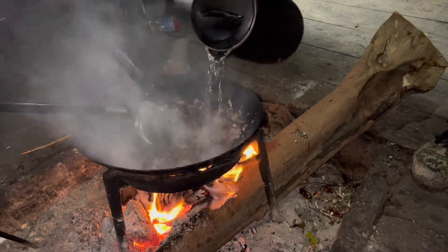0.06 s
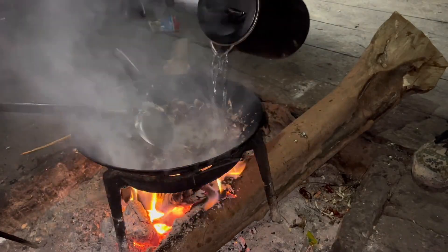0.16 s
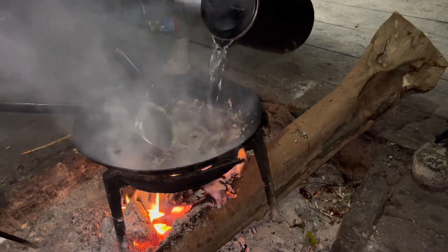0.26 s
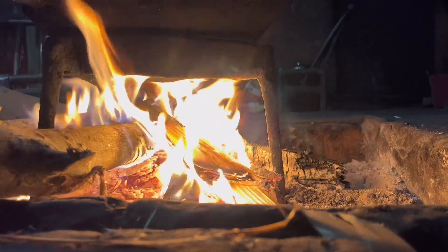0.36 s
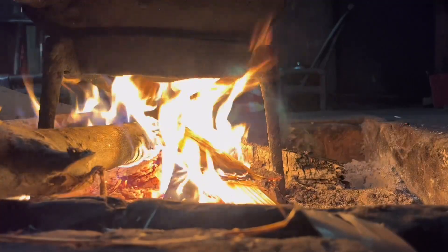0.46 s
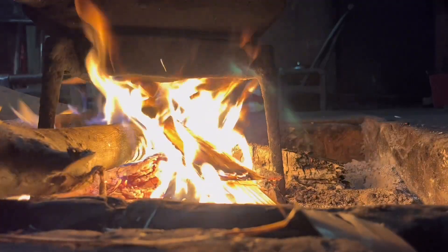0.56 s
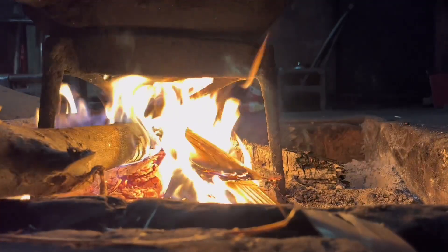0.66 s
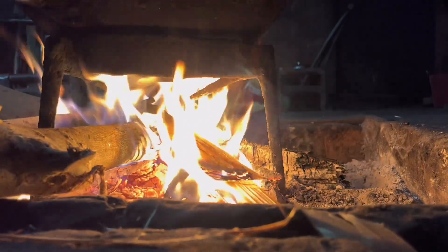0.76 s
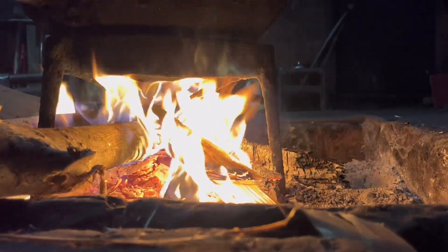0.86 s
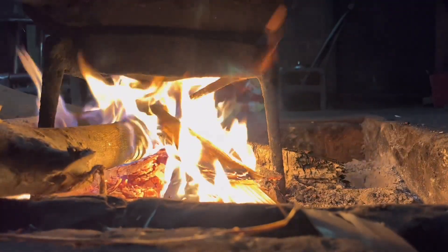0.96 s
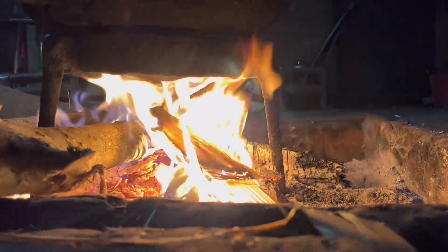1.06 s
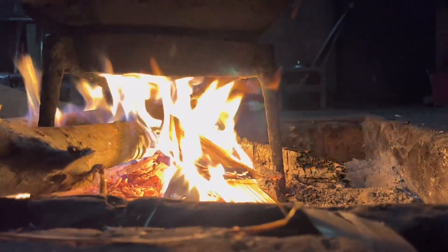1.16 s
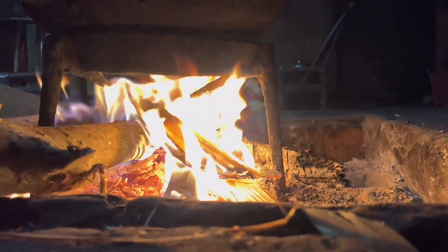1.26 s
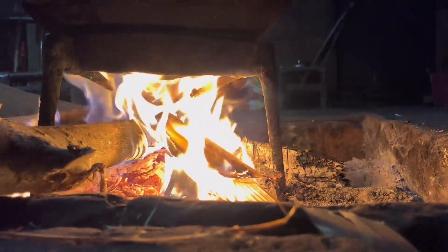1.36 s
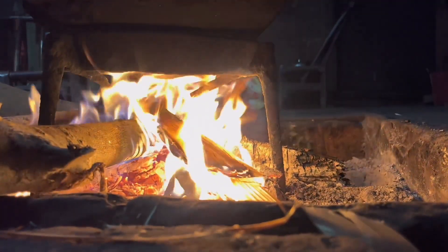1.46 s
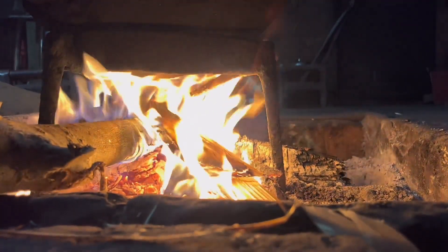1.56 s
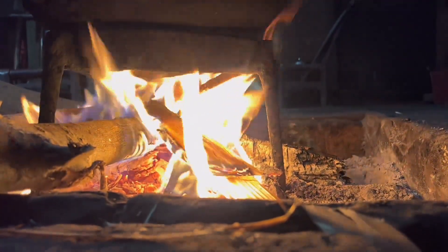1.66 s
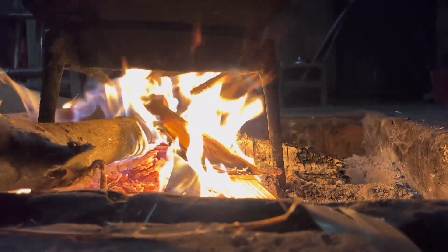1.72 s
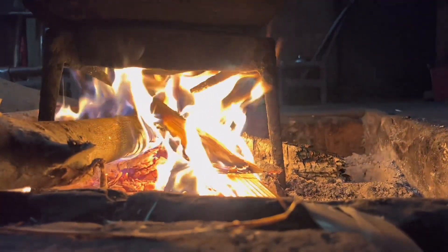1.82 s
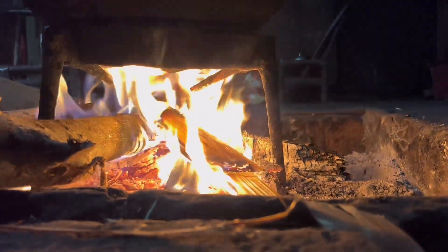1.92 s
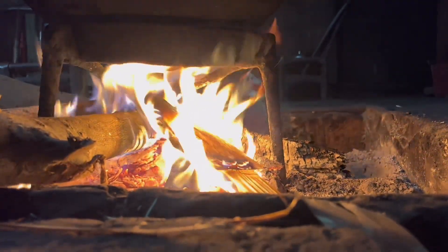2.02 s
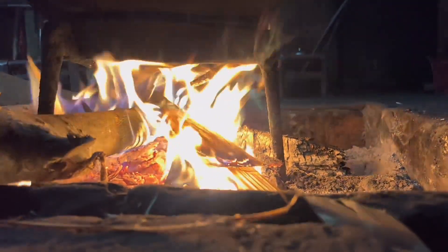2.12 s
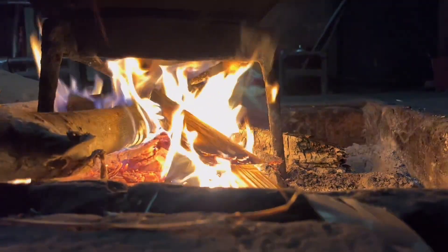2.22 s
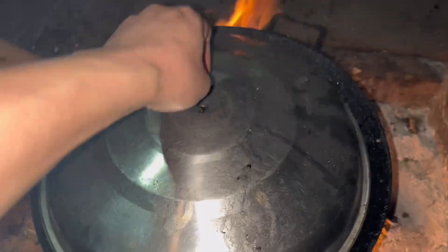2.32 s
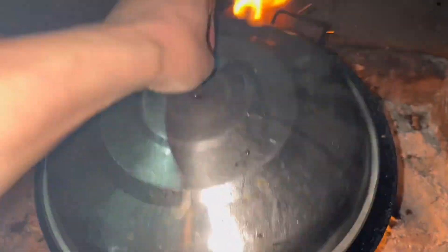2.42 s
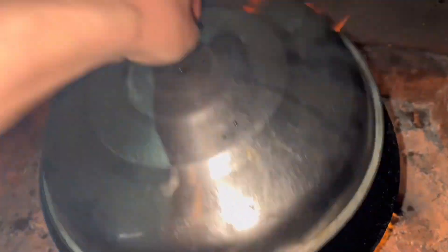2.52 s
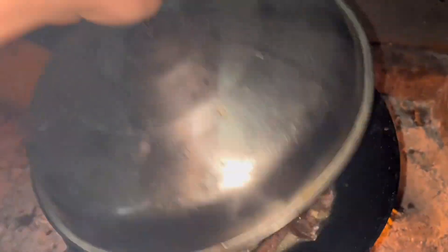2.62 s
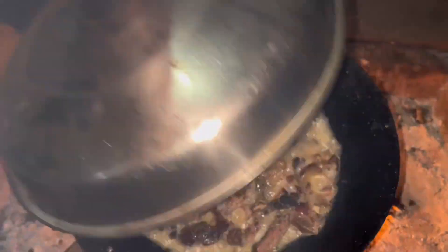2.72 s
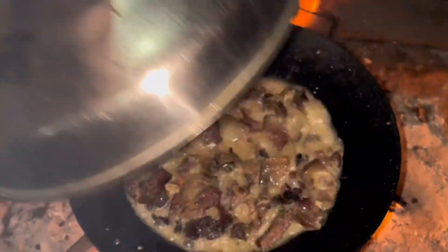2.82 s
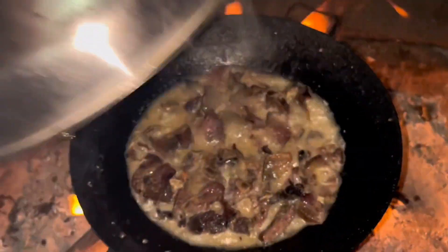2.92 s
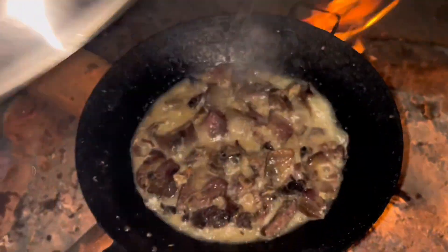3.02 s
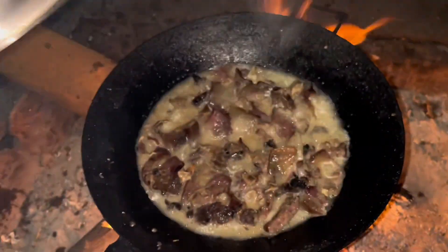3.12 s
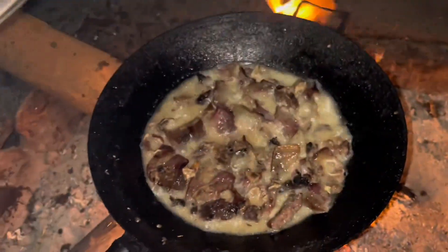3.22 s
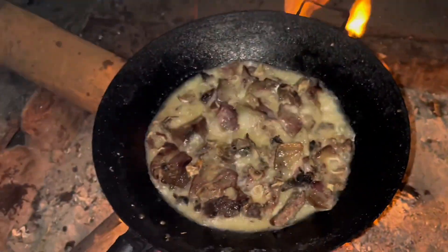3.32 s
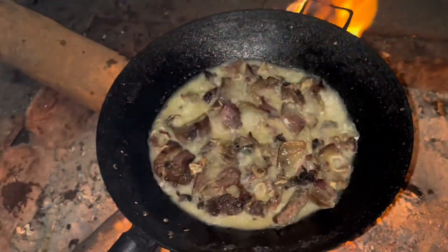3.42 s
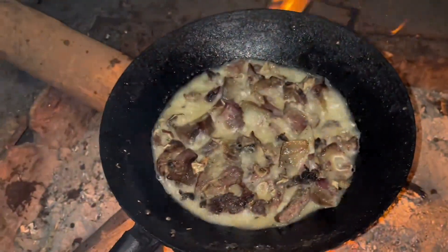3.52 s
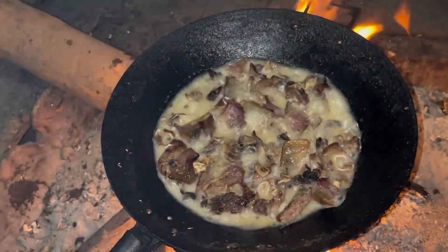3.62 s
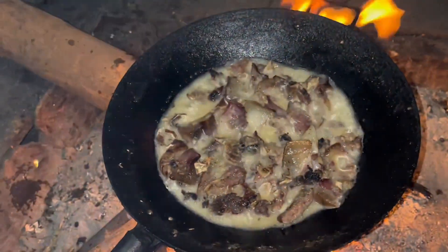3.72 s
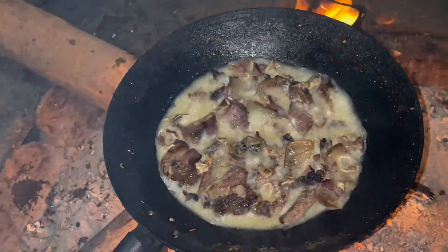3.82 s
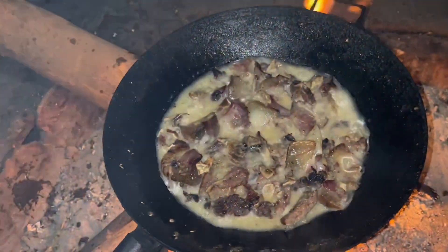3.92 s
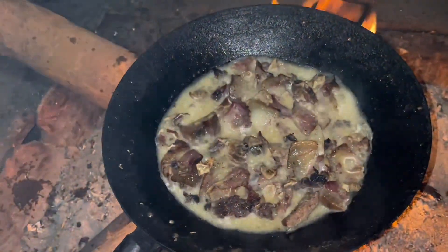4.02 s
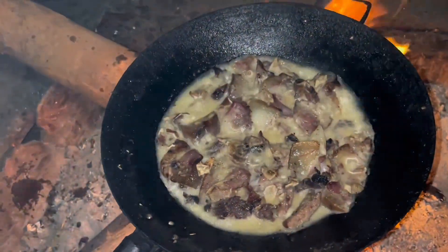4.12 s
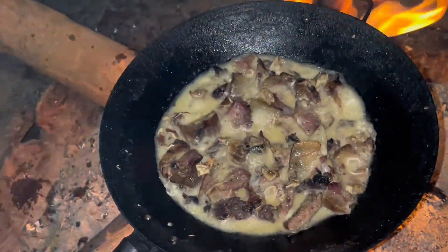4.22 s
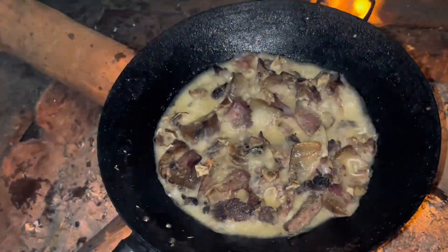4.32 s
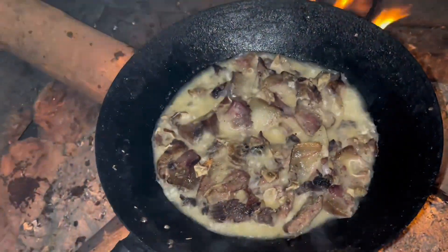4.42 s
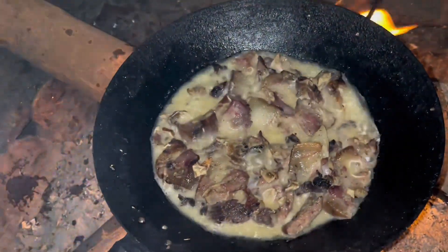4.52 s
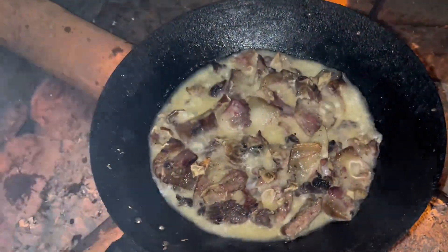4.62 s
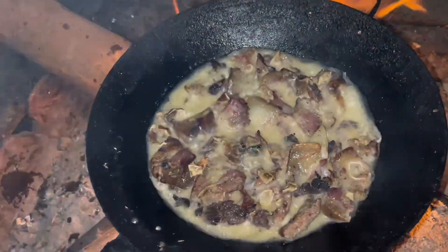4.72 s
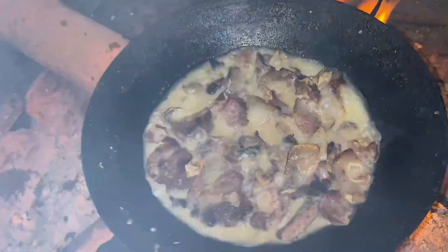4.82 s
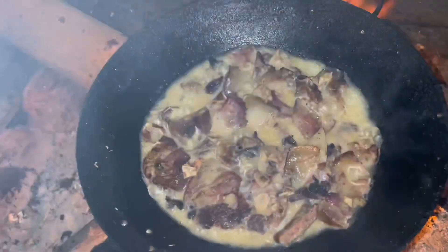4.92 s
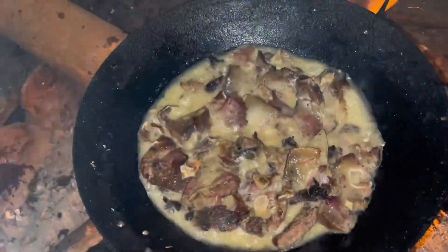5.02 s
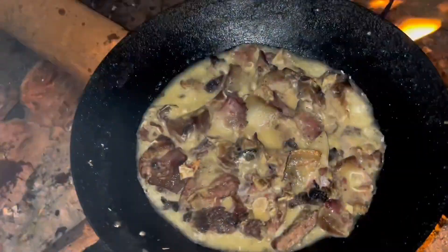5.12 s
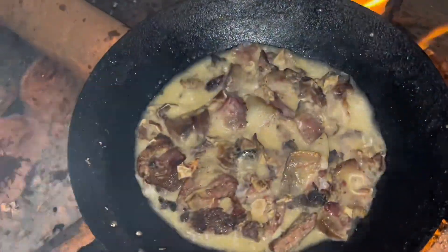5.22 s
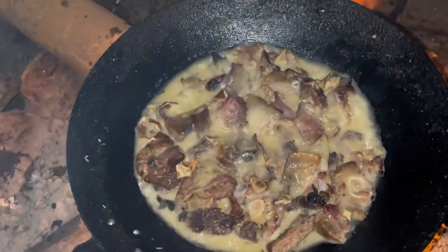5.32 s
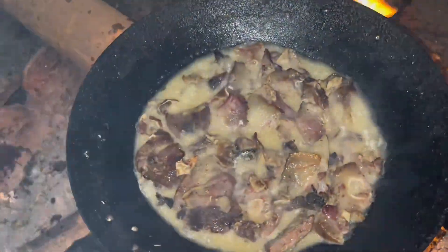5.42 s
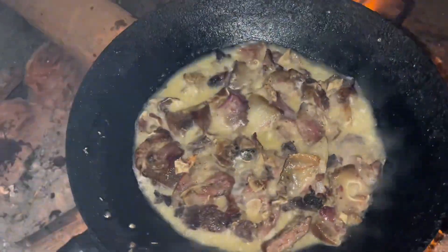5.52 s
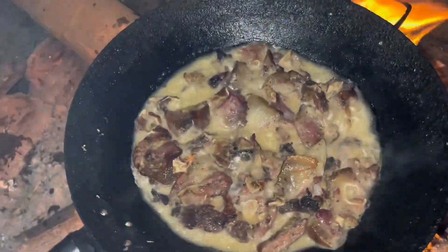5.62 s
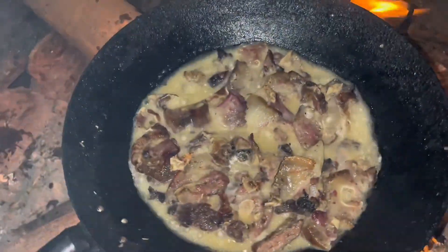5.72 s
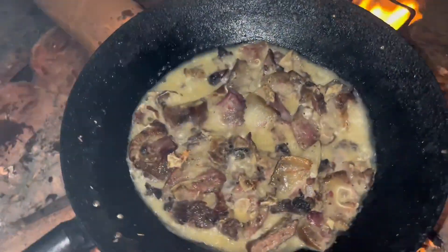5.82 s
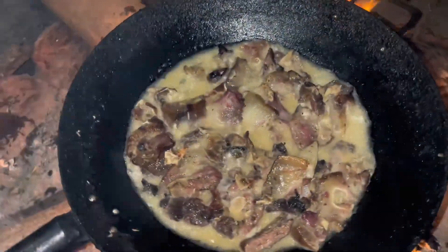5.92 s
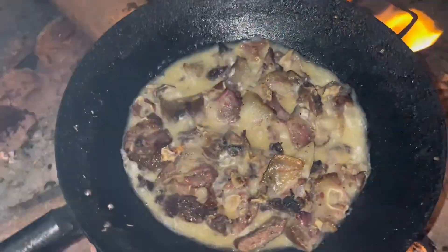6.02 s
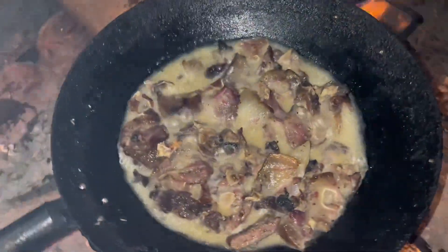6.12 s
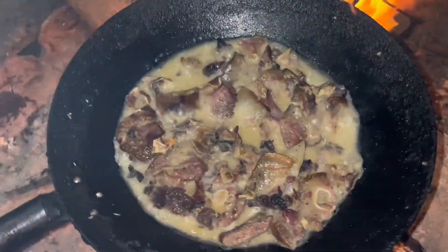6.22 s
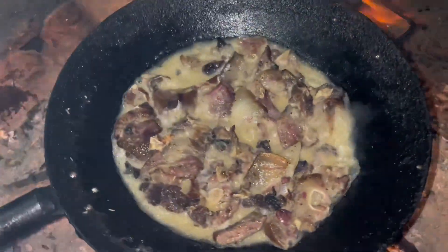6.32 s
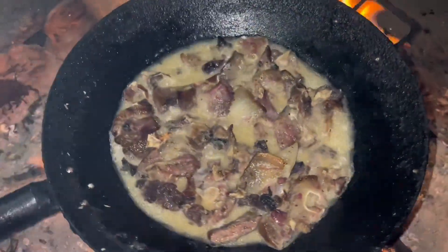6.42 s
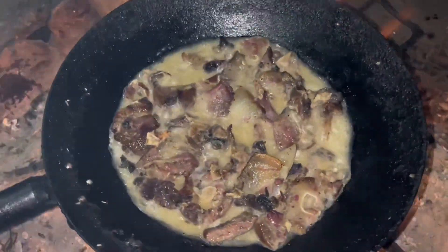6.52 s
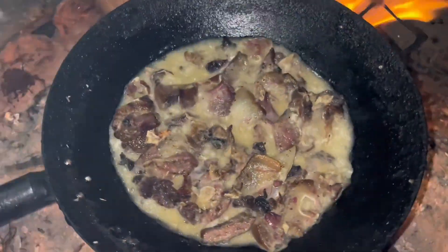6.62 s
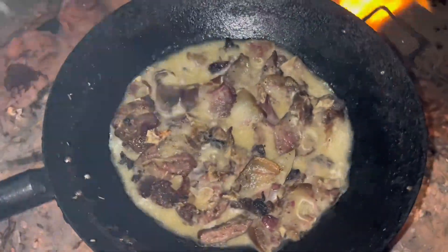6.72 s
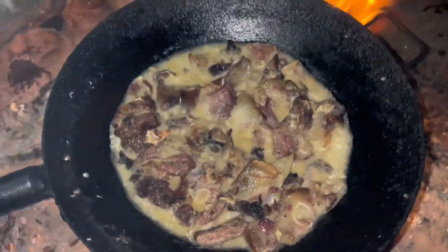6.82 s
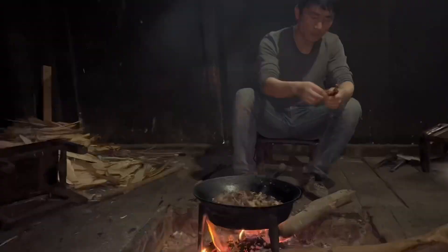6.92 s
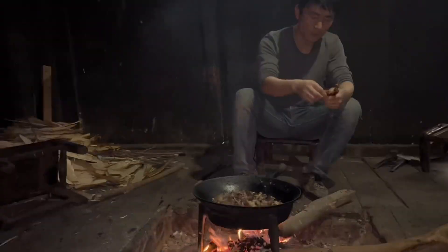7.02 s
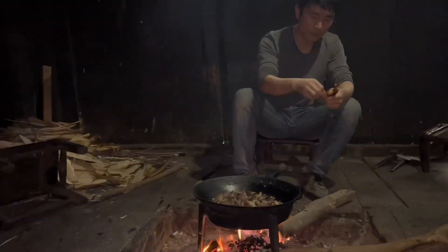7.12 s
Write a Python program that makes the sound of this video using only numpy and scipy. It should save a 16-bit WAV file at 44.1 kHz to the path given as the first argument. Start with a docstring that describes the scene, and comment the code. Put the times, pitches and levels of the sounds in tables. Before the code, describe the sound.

Close phone sound in a kitchen with an open hearth: splashing water bursts into bright steam, abruptly replaced by quieter low flames, singing gas from logs and faint wood ticks. Next a thin lid rocks and scrapes away, releasing crisp frying, snapping spits and plopping bubbles. The frying eases, deeper gurgling builds, soft gusts thump, and a final cut leaves the simmer far across the room.

```python
"""Meat sizzles, spits and bubbles in a wok once its lid scrapes off, while draughts buffet the phone.
Before that, water flashes to steam in the hot wok, then flames roar under it as the logs hiss;
last, it simmers from across the room. Hard cuts join the four scenes, heard at a phone's two ports.
Hiss and roar are coloured noise and grains; bubbles, flares, squeaks and gusts are short gliding tones.
Levels in the tables stand before the mix trims; spectra and resonances give relative levels."""
import sys
import numpy as np
from scipy import signal
from scipy.fft import rfft, irfft
from scipy.io import wavfile
from scipy.ndimage import uniform_filter1d

SR = 44100
rng = np.random.default_rng(int(sys.argv[2]) if len(sys.argv) > 2 else 0)


def to_wav(s):
    """Save 16-bit WAV."""
    ch = np.atleast_2d(s).T  # columns
    pcm = np.round(np.clip(ch, -1, 1) * 32767)  # PCM
    wavfile.write(sys.argv[1], SR, pcm.astype(np.int16))


N = 315756

# start and end of each scene, and the span in which small spits fly from the open wok [s]
POUR_S, FIRE_S, WOK_S, FAR_S = (0, .326), (.326, 2.293), (2.313, 6.953), (6.955, 7.2)
OPEN_S = (2.7, 6.95)
TOP_HZ = 15600  # upper limit of the sound
T = np.arange(N) / SR
HZ = np.maximum(np.arange(N // 2 + 1) * SR / N, 1)


def undb(db):
    """Decibels to gain."""
    return 10 ** (np.asarray(db) / 20)


def unit(x):
    """Scale to rms 1."""
    return x / np.sqrt(np.mean(x ** 2))


def curves(rows):
    """Draw every column of a (time, ...) table as a line over the whole timeline."""
    times, *columns = np.transpose(rows)
    return [np.interp(T, times, column) for column in columns]


def over_hz(points):
    """Join (frequency, value) points on a log-frequency axis."""
    hz, value = np.transpose(points)
    return np.interp(np.log(HZ), np.log(hz), value)


def colour(x, points):
    """Shape a spectrum that falls away below its first point; white noise keeps its power."""
    low_cut = np.sqrt(1 + (points[0][0] / 2 / HZ) ** 4)
    gain = undb(over_hz(points)) / low_cut
    return irfft(rfft(x) * unit(gain * (HZ < TOP_HZ)), N)


def resonate(x, modes):
    """Ring a set of (frequency, width, level) resonances; rms 1."""
    gain = 0
    for hz, width_hz, db in modes:
        gain = gain + undb(db) / (1 + 1j * (HZ ** 2 - hz ** 2) / (HZ * width_hz))
    return unit(irfft(rfft(x) * gain, N))


def noise():
    """Unrelated white noise at each port."""
    return rng.standard_normal((2, N))


def waver(rate, depth_db):
    """A gain that wanders at random about rate times a second, with an rms depth in dB."""
    size = int(SR / rate)
    held = np.repeat(rng.standard_normal(N // size + 1), size)
    smooth = uniform_filter1d(uniform_filter1d(held, size), size)[:N]
    return undb(depth_db * unit(smooth))


def during(span):
    """Open for one scene, with quick edges."""
    return uniform_filter1d(1. * ((T >= span[0]) & (T < span[1])), size=90)


def swell(s, length_s):
    """A smooth bell of height 1 around time s."""
    return np.exp(-(2 * (T - s) / length_s) ** 2)


def scatter(span, count):
    """Random moments spread over a span, one in each equal share of it."""
    return span[0] + (span[1] - span[0]) * (np.arange(count) + rng.random(count)) / count


def sizes(spread_db, count):
    """Random grain sizes, exponentially spread in dB and capped."""
    return undb(spread_db * np.minimum(rng.exponential(size=count), 5))


def crackle(rate, spread_db, decay_s):
    """Tiny grains at random, rate a second, each a dying puff of noise; rms 1."""
    bursts = (rng.random(N) < rate / SR) * sizes(spread_db, count=N) ** 2
    power = signal.lfilter([1], [1, -np.exp(-2 / (decay_s * SR))], bursts)
    return unit(noise() * np.sqrt(power))


def add(out, s, sound):
    """Mix a short sound in at time s."""
    i = int(np.clip(s * SR, 0, N - 1))
    out[:, i:i + sound.shape[1]] += sound[:, :N - i]


def snaps(times, peaks_db, decay_s, tail_db, tail_s):
    """Single sharp cracks, each with a short scatter off the surfaces nearby."""
    out, t = np.zeros((2, N)), T[:4096]
    shape = np.exp(-t / decay_s) + undb(tail_db) * np.exp(-t / tail_s)
    for s, db in zip(times, peaks_db):
        grit = rng.choice([-1, 1], (2, len(t)))
        add(out, s, grit * shape * undb(db))
    return out


def bubbles(rows, cycles, glide):
    """Each (time, level, pitch) bubble rings a few cycles, rising in pitch, out of step at the ports."""
    out, t = np.zeros((2, N)), T[:1100]
    lives = cycles * rng.uniform(.85, 1.15, len(rows))
    port_phase = np.array([[0], [np.pi / 2]])
    for (s, db, hz), life in zip(rows, lives):
        age = t * hz / life
        phase = 2 * np.pi * hz * t * (1 + glide * np.minimum(age, 2)) + port_phase
        envelope = np.exp(-age) * (1 - np.exp(-2 * hz * t))
        add(out, s, undb(db) * envelope * np.sin(phase))
    return out


def puffs(rows, apart, glide=0.17):
    """Each (time, length, level, pitch) puff swings the air, sliding in pitch, out of step at the ports."""
    out, t = np.zeros((2, N)), T[:8820] - .1
    draws = rng.uniform(-1.0, 1, (len(rows), 3))
    for (s, length_s, db, hz), (start, skew, slide) in zip(rows, draws):
        phase = 2 * np.pi * hz * t * (1 + glide * slide * t / length_s)
        phase = phase + np.pi * start + apart * skew * np.array([[1], [-1]])
        add(out, s + t[0], undb(db) * np.exp(-(2 * t / length_s) ** 2) * np.sin(phase))
    return out


def reflect(x, wet_db, t60_s, dull):
    """Add reflections, unrelated at the two ports; a short tail mostly ripples the spectrum."""
    t = T[:SR // 2]
    tail = signal.lfilter([1], [1, -dull], rng.standard_normal((2, len(t))))
    tail = tail * np.exp(-np.log(1000) * t / t60_s) * (t > .001)
    tail = tail / np.sqrt(np.sum(tail ** 2) / 2)
    wet = signal.fftconvolve(x, tail, axes=1)[:, :N]
    return (x + undb(wet_db) * wet) / np.sqrt(1 + undb(wet_db) ** 2)


def ports(x, likeness):
    """The two ports share more or less of the sound, depending on its wavelength."""
    alike = np.clip(over_hz(likeness), -.99, .99)
    a, b = rfft(x)
    mid = (a + b) / 2 * np.sqrt(1 + alike)
    side = (a - b) / 2 * np.sqrt(1 - alike)
    return irfft(np.array([mid + side, mid - side]), N)


# spectrum of water flashing to steam: (frequency [Hz], level [dB])
STEAM_SPECTRUM = [(30, -28), (70, -2.5), (150, -4.5), (300, -7), (550, -1), (1200, -1), (1800, -2.5),
                  (2600, -1), (3600, -3), (5000, -0.5), (6500, -3.5), (8000, -4), (11000, -1), (15000, -4)]


def pour():
    """Droplets flash to steam as the stream splashes; the bowl throws a bright band to the left."""
    hiss = colour(crackle(rate=10000, spread_db=0, decay_s=0.00048), STEAM_SPECTRUM)
    hiss = hiss * waver(rate=35.6, depth_db=-0.5)
    drops = crackle(rate=500, spread_db=2, decay_s=0.002) * waver(rate=30, depth_db=2)
    splash = resonate(drops, [(710, 360, -5), (1320, 210, 0)])
    bowl = resonate(noise(), [(4800, 1400, 0)]) * undb([[-7], [-22]])
    surge = undb(6.7 * swell(.13, length_s=0.18))  # the stream crosses a dry hot patch
    return (hiss + undb(-13) * splash + bowl * surge) * undb(-27)


# spectrum of the flames: (frequency [Hz], level [dB])
ROAR_SPECTRUM = [(25, -19), (45, -16), (75, -2), (110, -10), (150, -2), (190, -3), (240, -6), (300, 1.5),
                 (350, -6), (410, -11), (500, -21.5), (650, -30)]
# low puffs as the flames flare: (middle [s], length [s], peak [dB], pitch [Hz])
FLARES = [(.417, 0.013, -40, 284), (.505, 0.033, -40, 279), (.632, 0.022, -32.5, 310),
          (1.052, 0.024, -43, 303), (1.25, 0.013, -36, 217), (1.289, 0.0093, -38, 318),
          (1.48, 0.024, -42, 312), (1.664, 0.015, -33.5, 257), (2.031, 0.011, -47, 303),
          (2.224, 0.013, -36.5, 308)]
# spectrum of gas leaving the logs: (frequency [Hz], level [dB])
LOG_SPECTRUM = [(650, -6.5), (1150, -3), (1550, -3.5), (2000, -6.5), (2800, -2), (3800, -5), (5200, -3),
                (6500, -7.5), (8000, -12), (11000, -12.5), (15000, -12.5)]
# spectrum of the finest droplets, also heard in the frying and its spits: (frequency [Hz], level [dB])
SPRAY_SPECTRUM = [(5000, -19), (8000, 1.5), (11500, 3), (15000, 0)]
# gas hissing from the logs: (time [s], level [dB])
GAS_LEVEL = [(0.42, -57.5), (0.55, -58.5), (0.65, -56), (0.8, -57), (0.95, -53), (1.1, -57), (1.18, -54),
             (1.28, -56.5), (1.47, -56), (1.77, -51.5), (1.92, -53.5), (2.08, -50.5), (2.16, -53),
             (2.27, -51.5)]
# resonances of the hollows among the logs: (frequency [Hz], width [Hz], level [dB])
LOG_HOLLOWS = [(850, 89, -9.5), (921, 17, -2.5), (1427, 17, -2), (1665, 38, -11.5), (2830, 110, -8)]
# ticks of the burning wood: (time [s], peak [dB])
WOOD_TICKS = [(0.332, -17), (.6, -35.5), (0.762, -37), (1.136, -36), (1.176, -36), (1.775, -39),
              (2.056, -29), (2.263, -33)]


def fire():
    """Flames flutter and flare; gas hisses from the logs and sings in the hollows between them."""
    gas_db, = curves(GAS_LEVEL)
    roar = colour(noise(), ROAR_SPECTRUM + [(1200, -42), (3000, -70)])
    roar = roar * waver(rate=32, depth_db=0.4) * undb(-43.5)
    flares = undb(-0.5) * puffs(FLARES, apart=0.37)
    gas = colour(noise(), LOG_SPECTRUM) * waver(rate=21, depth_db=1.4)
    fizz = colour(crackle(rate=2400, spread_db=7.0, decay_s=0.00041), SPRAY_SPECTRUM)
    sputter = colour(crackle(rate=1000, spread_db=2.5, decay_s=0.0023), LOG_SPECTRUM)
    sputter = sputter * waver(rate=14.1, depth_db=-2.5)
    # off the hearth stones
    echoing = reflect(gas + undb(-12.5) * fizz, wet_db=1.5, t60_s=0.071, dull=0.11)
    hiss = (undb(-1.5) * echoing + undb(-4.5) * sputter) * undb(gas_db)
    # each hollow swells and fades by itself as the flames lick past it
    singing = np.zeros((2, N))
    for mode in LOG_HOLLOWS:
        singing += resonate(noise(), [mode]) * undb(mode[2]) * waver(rate=22, depth_db=2.9)
    # all sing louder as the gas comes faster
    singing = singing * undb(0.22 * (gas_db - gas_db.mean()))
    ticks = snaps(*np.transpose(WOOD_TICKS), decay_s=0.00017, tail_db=-11.0, tail_s=0.0052)
    return roar + flares + hiss + undb(-58.0) * singing + undb(-5.0) * ticks


# resonances of the air under the lid: (frequency [Hz], width [Hz], level [dB])
LID_AIR = [(390, 55, 11), (535, 37, -7), (1070, 130, -1)]
# resonances of the lid's thin metal: (frequency [Hz], width [Hz], level [dB])
LID_METAL_MODES = [(1210, 120, 1), (1460, 79, -9), (1686, 15, 0), (1970, 40, -7), (2870, 60, -6),
                   (3930, 80, -12), (4140, 47, 0)]
# the rocking lid pumps the air beneath it: (middle [s], length [s], peak [dB], pitch [Hz])
LID_ROCKING = [(2.376, 0.017, -33, 410), (2.457, 0.014, -36, 418)]
# the lid's edge squeaks on the rim: (middle [s], length [s], peak [dB], pitch [Hz])
LID_SQUEAKS = [(2.583, .02, -42, 3910), (2.61, 0.021, -36.5, 4500), (2.614, .014, -38, 4260),
               (2.718, .014, -41, 4540)]


def lid():
    """The boil rings in the air under the rocking lid, whose edge scrapes and squeaks along the rim."""
    # the ringing dies as the lid lifts [39 dB per s]
    covered = resonate(noise(), LID_AIR) * undb(-42.5 - 39 * np.maximum(T - 2.37, 0))
    # the edge's drag builds briefly to its hardest, then lightens as the lid comes free
    hardest_s, fade_db_per_s = 2.37, 71
    drag = np.interp(T, [2.31, hardest_s], [.45, 1])
    drag = drag * undb(-fade_db_per_s * np.maximum(T - hardest_s, 0))
    scrape = resonate(crackle(rate=1400, spread_db=2, decay_s=0.0013), LID_METAL_MODES) * drag
    rocking = puffs(LID_ROCKING, apart=0.3)
    squeaks = puffs(LID_SQUEAKS, apart=0.5, glide=0.028)
    rubbing = resonate(crackle(rate=900, spread_db=1.5, decay_s=.001), [(3770, 260, -3), (4440, 190, 0)])
    touching = np.interp(T, [2.54, 2.6, 2.7, 2.78], [0, 1, 1, 0])
    return covered + rocking + undb(-43.0) * scrape + squeaks + undb(-46) * rubbing * touching


# spectrum of the frying rim: (frequency [Hz], level [dB])
SIZZLE_SPECTRUM = [(500, -30), (1500, -0.5), (2200, -2), (3200, 3.5), (4500, 3.5), (6000, 2), (8000, -4),
                   (11500, -1), (15000, -4.5)]
# the frying swells as the lid comes off, then settles: (time [s], level [dB])
FRYING_LEVEL = [(2.33, -50.5), (2.42, -42.5), (2.6, -40.5), (2.8, -38), (3.05, -39), (3.4, -40), (3.7, -43),
                (4.1, -45), (4.6, -44.5), (5.2, -45.5), (5.8, -47), (6.94, -48)]


def frying():
    """Fat fries along the rim of the broth: a fine hiss, a crackle on top of it, and single spits."""
    fry_db, = curves(FRYING_LEVEL)
    # the lid holds back the body of the hiss until it comes off
    opening = undb(np.interp(T, [2.62, 2.68], [-3.5, 0]))
    hiss = undb(-5.5) * colour(crackle(rate=110, spread_db=2.0, decay_s=0.0012), SIZZLE_SPECTRUM) * opening
    # the phone moves over the bowl, so the hiss shifts between two reflections and back in 1.105 s
    shift = np.pi * T / 1.105
    for share in (np.cos(shift), np.sin(shift)):
        rim = colour(crackle(rate=1300, spread_db=1.0, decay_s=0.00072), SIZZLE_SPECTRUM) * opening
        spray = colour(crackle(rate=460, spread_db=2.5, decay_s=0.00051), SPRAY_SPECTRUM)
        fizzing = undb(-2.0) * rim + undb(-2.5) * spray
        hiss = hiss + share * reflect(fizzing, wet_db=-2.0, t60_s=0.025, dull=0.28)
    return hiss * waver(rate=16, depth_db=1.57) * undb(fry_db) + spits(fry_db)


# spectrum of the boiling broth: (frequency [Hz], level [dB])
BROTH_SPECTRUM = [(25, -23), (55, -18), (90, -4.5), (150, 4), (230, -7), (400, -3.5), (600, -5.5),
                  (760, -13), (1020, -8), (1400, -20.5), (2200, -17.5), (5000, -30)]
# resonances of the open bowl: (frequency [Hz], width [Hz], level [dB])
BOWL_MODES = [(377, 22, -6.5), (446, 16, -3), (590, 65, -8), (1029, 85, -1.5), (1473, 38, -15),
              (1900, 62, -19)]


def boiling(count=750, centre_hz=1150, octaves=0.34):
    """Small bubbles burst between the meat over murmuring broth and fire, a little muffled by the lid."""
    boil = undb(-47.5 + np.interp(T, [2.6, 2.75], [-5, 0])) * waver(rate=22, depth_db=0.78)
    # the deep gurgling builds as the broth comes to a rolling boil
    depth = undb(np.interp(T, [3.7, 4.8], [-1, 0]))
    murmur = colour(crackle(rate=420, spread_db=2.0, decay_s=0.0053), BROTH_SPECTRUM)
    times = rng.uniform(*WOK_S, count)
    pitch_hz = centre_hz * 2 ** (octaves * rng.standard_normal(count))
    rows = np.transpose([times, rng.uniform(-21, 0, count), pitch_hz])
    small = unit(bubbles(rows, cycles=2.1, glide=0.024))
    # the hollow of the bowl gives the pattering a faint pitch
    bowl = resonate(crackle(rate=130, spread_db=0.9, decay_s=0.00087), BOWL_MODES)
    deep = (undb(3.0) * murmur + undb(-5) * bowl) * depth
    return (deep + undb(-9.0) * small) * boil + plops()


# spectrum of air buffeting the ports: (frequency [Hz], level [dB])
BUFFET_SPECTRUM = [(20, -24), (40, -8.5), (60, -4), (85, 0.5), (130, -14), (250, -18.5), (600, -82)]
# gusts on the ports: (middle [s], length [s], peak [dB], pitch [Hz])
GUSTS = [(3.572, 0.053, -34, 54), (3.638, .035, -42, 58), (5.391, 0.037, -30.5, 62.4),
         (5.43, 0.064, -30, 58.4), (5.479, 0.068, -33, 60.4), (5.617, 0.026, -22, 71),
         (5.706, 0.051, -33, 55), (5.76, 0.045, -27.5, 57), (5.818, 0.027, -28, 62),
         (6.06, 0.032, -26, 62.5), (6.419, 0.072, -31.5, 66), (6.561, 0.048, -32.5, 60),
         (6.631, 0.05, -29, 64.7), (6.784, 0.036, -23.5, 54.3), (6.825, 0.024, -27, 70),
         (6.911, 0.049, -35, 62.4)]


def draught():
    """Air flutters on the ports, more strongly once the phone leans in; single gusts thump softly."""
    air = colour(noise() + 0.7 * noise()[0], BUFFET_SPECTRUM)  # partly shared by the ports
    flutter = undb(-53 + np.interp(T, [5.2, 5.4], [0.5, 2.5])) * waver(rate=30, depth_db=3.5)
    # eddies roughen each gust
    eddies = undb(-13.5) * sum(undb(db) * swell(s, length_s) for s, length_s, db, hz in GUSTS)
    thumps = puffs(GUSTS, apart=1.0, glide=0.29)
    return air * np.hypot(flutter, eddies) + undb(-2.0) * thumps


# spectrum of the crack of a spit: (frequency [Hz], level [dB])
SPIT_SPECTRUM = [(200, -49), (1100, -2), (2200, -2), (5500, 1.5), (8000, -1.5), (12000, -32)]
# single spits of fat, strong and faint: (time [s], bright snap [dB], lower crack [dB])
PLACED_SPITS = [(2.3505, -26, -40), (2.7465, -22, -27), (2.812, -22, -33), (2.8228, -9.5, -20.5),
                (2.9117, -25, -31), (2.9527, -19, -46), (2.9552, -16, -40), (2.9632, -20, -48),
                (2.9872, -12.5, -17.5), (3.009, -15.5, -36), (3.0165, -24, -25), (3.0632, -19, -17.5),
                (3.0767, -19, -25), (3.2305, -22, -28), (3.247, -27, -31), (3.3144, -15, -25.5),
                (3.3205, -26, -30), (3.3712, -22, -25.5), (3.4501, -30, -23), (3.4642, -22, -25),
                (3.622, -7.5, -17.5), (3.6745, -30, -28), (3.788, -21, -33), (3.7965, -23, -31),
                (3.8526, -24, -37), (3.864, -20, -38), (3.911, -24, -33), (3.957, -36, -34),
                (3.9859, -20.5, -36), (4.273, -22.5, -25), (4.2756, -20, -42), (4.43, -32, -31),
                (4.4705, -21, -32), (4.51, -21, -35), (4.5276, -27, -33), (4.5705, -20, -35),
                (4.637, -21, -46), (4.6643, -21, -44), (4.741, -40, -40), (4.7715, -26, -31),
                (4.8703, -18, -34), (4.9325, -37, -32.5), (5.1915, -41, -34), (5.369, -22.5, -29),
                (5.429, -29, -32), (5.463, -27, -43), (5.573, -29, -45), (5.7169, -18.5, -34),
                (5.76, -27, -42), (5.7863, -28, -32), (5.798, -14, -25), (5.9633, -25, -39),
                (6.1188, -22, -33), (6.2985, -29, -41), (6.3275, -21, -36), (6.3568, -18.5, -30),
                (6.3953, -26, -34), (6.4003, -21, -38), (6.5475, -27, -33), (6.655, -27, -39),
                (6.727, -22, -33), (6.772, -35, -35), (6.919, -22, -31)]


def spits(fry_db, count=40):
    """A bright snap as the fat's film breaks, a steam crack behind it; small spits follow the frying."""
    when = scatter(OPEN_S, count=count)
    heat_db = np.interp(when, T, fry_db)
    small_snap_db = heat_db + rng.uniform(12, 16, count)
    small_crack_db = heat_db + rng.uniform(1, 6, count)
    small = np.transpose([when, small_snap_db, small_crack_db])
    times, snap_db, crack_db = np.vstack([PLACED_SPITS, small]).T
    snap = colour(snaps(times, snap_db, decay_s=0.00028, tail_db=-19.0, tail_s=0.0045), SPRAY_SPECTRUM)
    crack = colour(snaps(times, crack_db, decay_s=0.0011, tail_db=-19.5, tail_s=0.029), SPIT_SPECTRUM)
    return undb(-0.7) * snap + undb(-0.17) * crack


# spectrum of a bubble's skin tearing: (frequency [Hz], level [dB])
SMACK_SPECTRUM = [(700, 2), (1200, 0.5), (2100, 0), (3200, -8.5), (6000, -34), (12000, -33)]
# single bubbles in the boil, strong and faint:
# (time [s], peak [dB], pitch [Hz], ring length [cycles], low answer of the bowl [dB])
SINGLE_BUBBLES = [(3.119, -20.5, 1540, 2, -27), (3.247, -21.5, 1180, 1.5, -40),
                  (3.285, -26.5, 1026, 3.4, -50), (3.321, -28, 1110, 2.4, -33),
                  (3.4499, -22, 1130, 3.2, -37), (3.496, -24.5, 1060, 2.9, -46),
                  (3.6535, -24.5, 1740, 2, -34), (3.8473, -23, 2000, 1.8, -39),
                  (3.8631, -27, 1060, 2.5, -40), (4.0376, -25.5, 970, 3, -48),
                  (4.0746, -20, 1500, 1.5, -29), (4.094, -29, 1150, 2.2, -36), (4.108, -32, 1300, 2, -41),
                  (4.2598, -25.5, 1080, 3.7, -27), (4.371, -41, 900, 2, -39), (4.3875, -28, 1020, 2.5, -42),
                  (4.4293, -39, 900, 2, -30), (4.458, -28, 1300, 2.2, -39), (4.51, -28, 1080, 3, -41),
                  (4.596, -32, 664, 2.2, -47), (4.6135, -31, 1030, 2.5, -55), (4.626, -32, 1860, 2.8, -42),
                  (4.741, -28, 980, 2.5, -46), (4.799, -30, 1600, 2, -30), (4.851, -20, 1500, 1.1, -33),
                  (5.0235, -28.5, 930, 3.2, -45), (5.081, -23.5, 1550, 1.5, -31),
                  (5.1368, -30, 980, 2, -44), (5.1806, -28, 1450, 2, -32), (5.202, -24, 1050, 1.8, -45),
                  (5.35, -31, 970, 2.7, -47), (5.4056, -22, 2400, 1.8, -35),
                  (5.4678, -15.5, 1470, 1.7, -32), (5.5336, -30, 995, 2.5, -31),
                  (5.6165, -25.5, 1230, 2, -32), (5.637, -29, 1480, 2.8, -38),
                  (5.7855, -34, 1700, 1.5, -48), (5.8457, -24, 1150, 1.4, -31),
                  (5.848, -26, 3380, 3.6, -46), (5.866, -28, 4700, 5.6, -29), (5.9976, -30, 4140, 6.3, -35),
                  (6.0455, -31, 975, 2.5, -46), (6.0802, -27, 990, 2.5, -43), (6.0927, -27, 1170, 2, -33),
                  (6.12, -34, 1400, 2, -47), (6.142, -28, 960, 2.8, -41), (6.177, -22.5, 1150, 1.2, -35),
                  (6.3273, -33, 945, 2.5, -37), (6.348, -27, 965, 3.4, -32), (6.3867, -31.5, 940, 2.5, -46),
                  (6.4213, -32, 1000, 1.8, -30), (6.465, -29, 1470, 2.5, -49),
                  (6.546, -25.5, 4260, 5.3, -33), (6.6128, -27, 1170, 1.4, -39),
                  (6.666, -28, 1240, 1.9, -41), (6.745, -19.5, 1460, 1.4, -25), (6.7595, -36, 1000, 2, -34),
                  (6.8626, -25.5, 1020, 2.2, -24.5)]


def plops():
    """A single bubble smacks as its skin tears, its cavity rings and the bowl answers with a low note."""
    times, peak_db, hz, cycles, answer_db = np.transpose(SINGLE_BUBBLES)
    ring = bubbles(np.transpose([times, peak_db, hz]), cycles=cycles, glide=0.013)
    softer_db = 8 * np.minimum(np.log2(hz / 1000), 0)  # wide, low bubbles tear gently
    tears = snaps(times, peak_db + softer_db, decay_s=0.00022, tail_db=-26, tail_s=0.014)
    smack = colour(tears, SMACK_SPECTRUM)
    answer_hz = 438 * 2 ** (0.31 * rng.standard_normal(len(times)))
    answer = bubbles(np.transpose([times, answer_db, answer_hz]), cycles=1.95, glide=.01)
    return undb(-2.0) * ring + undb(-7) * smack + undb(-2.5) * answer


# spectrum of the hearth from afar: (frequency [Hz], level [dB])
FAR_SPECTRUM = [(30, -28), (70, 7.5), (130, 2), (210, -5), (330, 9), (470, -11), (600, -5), (760, -0.5),
                (950, 2.5), (1600, -1), (2500, -6), (4500, -8.5), (6500, -14.5), (8000, -25),
                (12000, -14.5), (15000, -29)]
# hollow tones of the hearth from afar: (frequency [Hz], width [Hz], level [dB])
FAR_TONES = [(204, 21, 7.5), (463, 30, 7.5), (584, 58, -2), (910, 58, 2), (1190, 87, -1), (2660, 34, -15),
             (3140, 100, -22)]


def far_hearth():
    """Across the room the simmer is dull and blurred, and the hollow tones of the hearth stand out."""
    simmer = colour(crackle(rate=750, spread_db=-2.0, decay_s=0.0051), FAR_SPECTRUM)
    blurred = reflect(simmer, wet_db=2.0, t60_s=0.046, dull=0.14)
    return undb(-42.0) * blurred + undb(-43.5) * resonate(noise(), FAR_TONES)


# likeness of the ports, opposed near 8 and 15 kHz, in step between: (frequency [Hz], correlation [-1 to 1])
LIKENESS_FACING = [(100, 1), (350, 0.92), (700, 0.54), (1300, 0.45), (2400, 0.086), (5000, -0.023),
                   (6800, 0.11), (8000, -1.01), (9500, 0.012), (10700, 0.93), (12700, 0.95), (13800, 0.4),
                   (15000, -1.3)]
# the same beside the fire and across the room, where sound arrives from the sides
# and the middle range is opposed too: (frequency [Hz], correlation [-1 to 1])
LIKENESS_SIDEWAYS = [(100, 0.95), (370, 0.9), (680, -0.066), (930, -0.17), (1420, -0.56), (2100, -0.027),
                     (2900, -0.13), (4400, 0.05), (6800, 0.061), (8000, -0.93), (9500, 0.44), (10700, 0.72),
                     (12700, 1), (13800, 0.25), (15000, -1.4)]


def scene():
    """The four scenes, one after the other."""
    # off the kitchen walls
    wok = reflect(lid() + frying() + boiling(), wet_db=-14.0, t60_s=0.2, dull=0.64)
    facing = pour() * during(POUR_S) + wok * during(WOK_S)
    sideways = fire() * during(FIRE_S) + far_hearth() * during(FAR_S)
    heard = ports(facing, LIKENESS_FACING) + ports(sideways, LIKENESS_SIDEWAYS)
    return heard + draught() * during(WOK_S)


def record(dry):
    """The phone cuts the top with a steep low-pass."""
    return signal.sosfilt(signal.ellip(8, .2, 70, TOP_HZ, fs=SR, output="sos"), dry)


dry = scene()
out = record(dry)
to_wav(out)
```